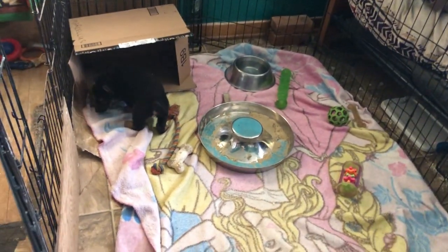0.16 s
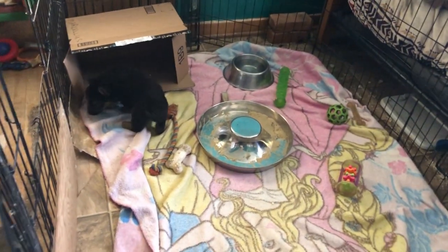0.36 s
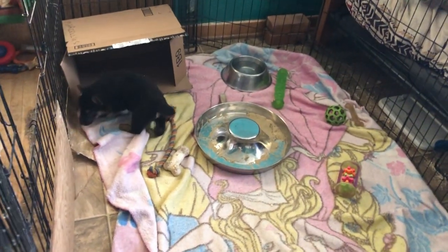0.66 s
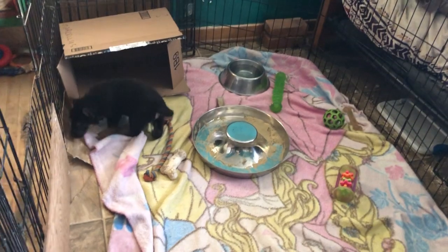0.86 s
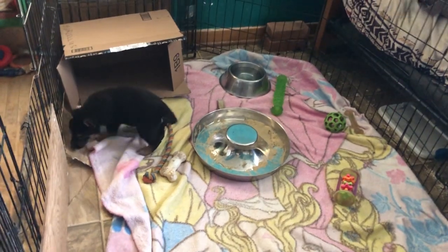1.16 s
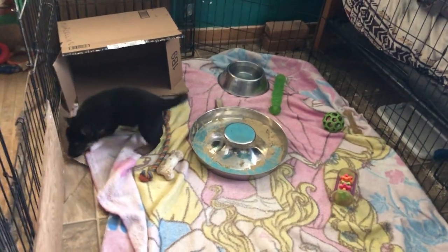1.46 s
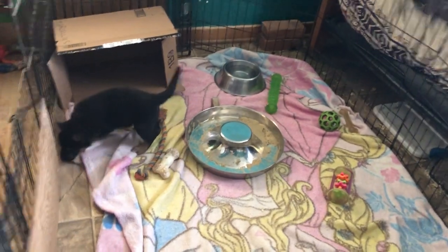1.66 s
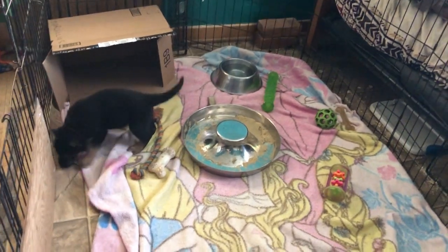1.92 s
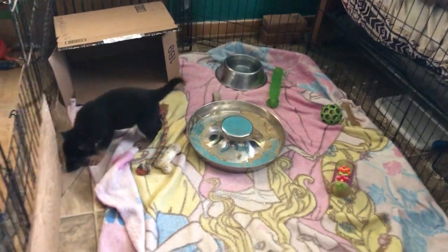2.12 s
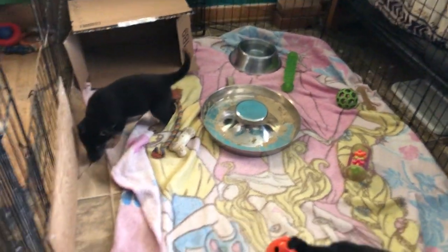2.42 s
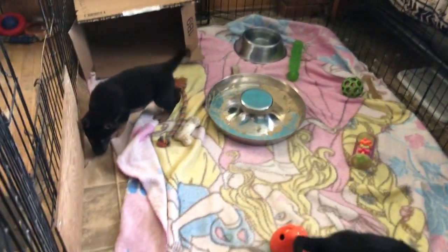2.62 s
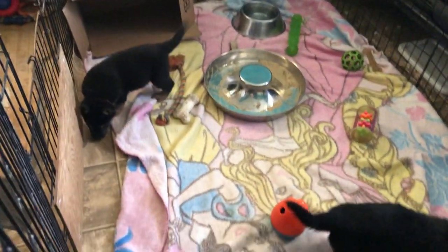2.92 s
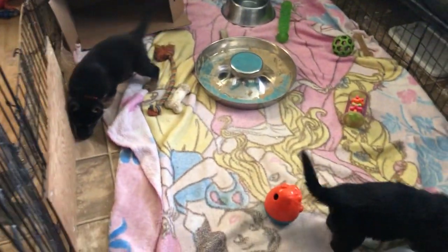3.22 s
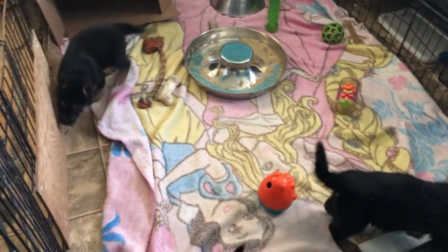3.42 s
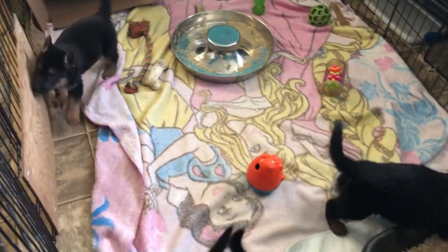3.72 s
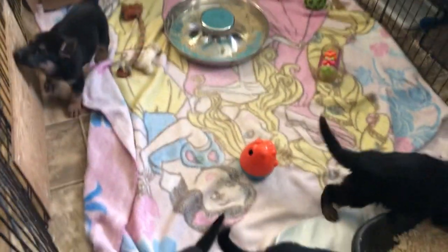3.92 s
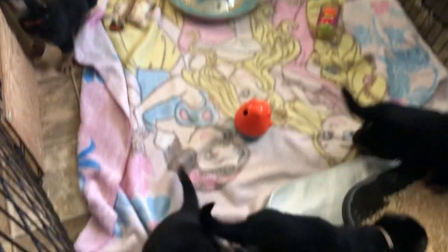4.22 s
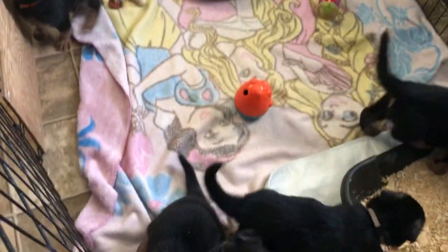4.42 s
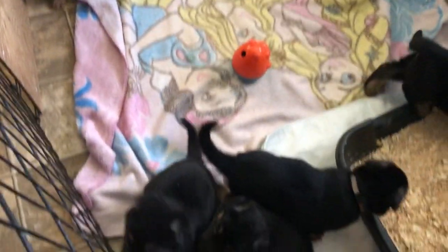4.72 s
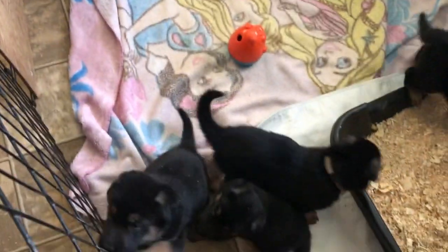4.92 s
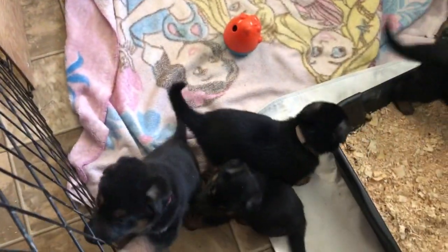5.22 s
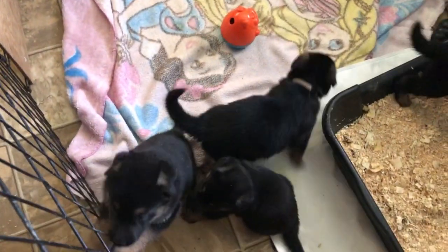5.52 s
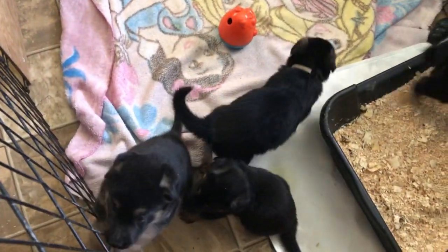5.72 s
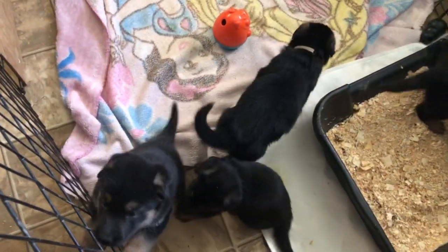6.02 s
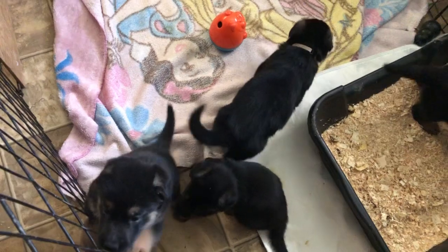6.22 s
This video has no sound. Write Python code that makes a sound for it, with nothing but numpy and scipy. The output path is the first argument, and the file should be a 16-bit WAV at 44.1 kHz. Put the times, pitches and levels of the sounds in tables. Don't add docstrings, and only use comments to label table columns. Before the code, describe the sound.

A quiet, small hard room, heard closely by a phone microphone. From 0 to 0.7 s paws shuffle and scuff on blankets, with small breath puffs and one claw tap. A faint squeak comes at 0.8 s, then short hoarse puppy yelps at 1.0, 1.3, 1.6 (loudest of these) and 1.95 s, some tailing into thin, very high nasal whistles. Claws flick the wire fence around 1.6, 1.9, 2.2 and 2.4 s, and again at 3.8. Longer whines begin: a low wavering one at 2.3, a steadier one at 2.7, a yelp stretching into a whine at 3.1-3.5, one climbing and breaking higher at 3.65-4.0. The loudest, highest cry bursts at 4.2 and falls by 4.5, slightly overloading. Then soft hums from 4.7 to the end at about 6.3, a second puppy's distant whimpers between them, blanket rustles and claw taps on tile, hardest near 5.7.

```python
import sys
import numpy as np
from scipy import signal
from scipy.fft import rfft, irfft, next_fast_len
from scipy.io import wavfile
from scipy.ndimage import uniform_filter1d, map_coordinates

SR = 44100
rng = np.random.default_rng(int(sys.argv[2]) if len(sys.argv) > 2 else 0)


def transcribe(u):
    v = np.clip(np.atleast_2d(u).T, -1, 1)
    q = np.round(v * 32767).astype(np.int16)
    wavfile.write(sys.argv[1], SR, q)


def voltage_ratio(decibels):
    exponent = np.asarray(decibels, float) / 20
    return 10 ** exponent


N = 280476
TOP_HZ = 15830


def along(points, hz):
    f, v = np.transpose(points)
    return np.interp(np.log(hz + 1), np.log(f + 1), v)


def unit(x):
    return x / np.sqrt(np.mean(x ** 2) + 1e-20)


def wobble(rate, size=N):
    knots = rng.standard_normal(int(size * rate / SR) + 4)
    return map_coordinates(knots, [np.arange(size) * rate / SR])


def wobbles(count, rate, size):
    return np.array([wobble(rate, size) for _ in range(count)])


def noise(spectrum):
    m = next_fast_len(N + 8192)
    colour = voltage_ratio(along(spectrum, np.fft.rfftfreq(m, 1 / SR)))
    return unit(irfft(rfft(rng.standard_normal(m)) * colour, m)[:N])


def bursts(rows):
    t = np.arange(N) / SR
    envelope = np.zeros(N)
    for start, length, db in rows:
        u = (t - start) / length
        envelope += voltage_ratio(db) * np.clip(u / 0.17, 0, 1) * np.clip((1 - u) / 0.7, 0, 1)
    return envelope


def phrases(tables, rise, fall):
    for rows in tables:
        s, *cols = np.transpose(rows)
        t = np.arange(round(s[0] * SR), min(round(s[-1] * SR), N)) / SR
        gate = np.clip(np.minimum((t - s[0]) / rise, (s[-1] - t) / fall), 0, 1)
        yield round(s[0] * SR), t, [np.interp(t, s, c) for c in cols], gate


# time in seconds, paw level in dB, blanket rustle level in dB.
SHUFFLE = [
    (0, -60, -68),
    (.65, -69, -73),
    (4.4, -68, -72),
    (5.2, -61, -69),
    (6.0, -68, -73),
]
# start in seconds, length in seconds, level in dB.
SCUFFS = [(0, 0.076, -58.5), (.125, 0.049, -62.5), (.355, 0.09, -59), (.49, 0.062, -59), (2.56, 0.097, -78),
          (4.55, 0.18, -55), (5.0, 0.12, -53), (5.08, 0.21, -58), (5.61, 0.24, -68.5), (6.083, 0.14, -55)]
# frequency in Hz, level in dB.
PAWS = [(24, -45.5), (40, -8), (331, -11.5), (557, -9), (951, -17), (1400, -22), (1820, -49.5),
        (3080, -120)]
# frequency in Hz, level in dB.
RUSTLE = [(530, -40), (900, 3), (3110, -2.5), (4460, -4.5), (5280, -2), (14900, -9.5), (16000, -22.5)]


def shuffling():
    s, paws_db, rustle_db = np.transpose(SHUFFLE)
    t = np.arange(N) / SR
    lumps = wobble(12)
    paws = voltage_ratio(np.interp(t, s, paws_db) + 3 * lumps + 2 * wobble(45)) * noise(PAWS)
    cloth = voltage_ratio(np.interp(t, s, rustle_db)) + bursts(SCUFFS)
    return paws + cloth * voltage_ratio(1.5 * lumps + 2 * wobble(60)) * noise(RUSTLE)


# frequency in Hz, level in dB.
AIR = [(15, -50.5), (25, -10.5), (309, 5), (591, -11.5), (911, -3), (2550, -13), (4140, -10.5),
       (14800, -25.5), (16000, -26.5)]


def room_air():
    return voltage_ratio(-57.5 - 4.5 + 1.5 * wobble(7) + wobble(30)) * noise(AIR)


# start in seconds, length in seconds, centre in Hz, level in dB.
PANTS = [(0.125, 0.094, 240, -53), (0.371, 0.093, 338, -46), (0.84, 0.088, 198, -55.5),
         (1.078, 0.11, 345, -48), (1.227, 0.094, 163, -58), (1.629, 0.038, 360, -43.5),
         (2.627, 0.17, 487, -50), (3.024, 0.16, 540, -47.5), (4.582, 0.15, 215, -50),
         (5.087, 0.13, 230, -56.5), (5.577, 0.051, 510, -65), (5.907, 0.16, 540, -55.5),
         (2.567, 0.17, 2600, -61.5), (3.52, 0.12, 4000, -58), (5.72, 0.027, 2000, -66),
         (5.74, .02, 1000, -52)]


def panting():
    out = np.zeros(N)
    for s, length, hz, db in PANTS:
        b, a = signal.iirpeak(hz, 1.1, SR)
        breath = signal.lfilter(b, a, rng.standard_normal(N))
        out += bursts([(s, length, db)]) * unit(signal.lfilter(b, a, breath))
    return out * voltage_ratio(4.2 * wobble(70))


# time in seconds, level in dB.
TICKS = [
    (.38, -52.5),
    (4.564, -51.5),
    (4.93, -59),
    (5.01, -47),
    (5.05, -56),
    (5.095, -51),
    (5.193, -47),
    (5.429, -67),
    (5.678, -40.5),
    (5.977, -50.5),
]


def ticks():
    out, t = np.zeros(N + SR), np.arange(SR // 50) / SR
    for s, db in TICKS:
        tap = np.diff(rng.standard_normal(len(t) + 1))
        out[round(s * SR):][:len(t)] += voltage_ratio(db - 60 * t / 0.011) * tap
    return out[:N]


# time in seconds, share of pitch lost in 20 ms.
FALLS = [
    (2.512, .2),
    (2.945, .14),
    (4.005, .2),
]


def fold_pitch(hz, t):
    lost = sum(share * np.clip((t - s) / .02, 0, 1) * (t < s + .04) for s, share in FALLS)
    return uniform_filter1d(hz * (1 - lost), size=250)


# middle in seconds, half length in seconds, roughness from 0
RASPS = [
    (.797, .008, 1.2),
    (1.075, .025, .35),
    (1.36, .03, .3),
    (1.995, .012, .4),
    (2.03, .04, .15),
    (3.2, .03, .15),
    (3.72, .03, .15),
    (4.195, .015, .08),
    (6.155, .015, .35),
]


def roughness(t, loud, strain, fray, done, sag):
    rough = .012 + strain * np.clip((loud + 25) / 12, 0, 1)
    rough = rough + fray * done ** 2 + .015 * sag
    return rough + sum(depth * np.exp(-((t - s) / half) ** 2) for s, half, depth in RASPS)


# frequency in Hz, level in dB.
MOUTH = [(2600, -4), (3300, 1.5), (4400, 0.5), (5200, -7), (6300, -2.5), (7300, -6.5), (8300, -13.5),
         (9000, -61)]


def mouth_shape(harmonics, t, mouth, tilt_db, ridge_db, ridge_hz, soft):
    tilt = tilt_db * np.log2(harmonics / 4000)
    ridge = ridge_db * np.exp(-((harmonics - ridge_hz) / 540) ** 2)
    shape = voltage_ratio(along(MOUTH, harmonics) + tilt + ridge)
    jaw = np.clip((t - t[0]) / .012, .12, 1)
    shape *= voltage_ratio(mouth) * jaw / np.sqrt(np.sum(shape[:5] ** 2, axis=0))
    return shape * voltage_ratio(-15 * soft * np.maximum(np.log2(harmonics / 5550), 0))


# frequency in Hz, level in dB.
SHEEN = [(7500, -40), (9000, -14), (10000, -3), (11500, 0), (13500, -4), (15500, -2)]


def sheen(harmonics, t, mouth, level_db):
    patches = 6 * wobbles(len(harmonics), 36.1, len(t))
    glint = voltage_ratio(0.43 * mouth + level_db + patches + along(SHEEN, harmonics))
    return glint * np.minimum((t - t[0]) / .03, 1) * (harmonics < TOP_HZ)


# frequency in Hz, level in dB.
BREATH = [(500, -3), (3000, 4), (7000, -9.5), (9000, -4.5), (12000, -43)]


def voice(tables, tongues, moves, jitter, shimmer_db, sheen_db, breath_db, strain, frays, nose_under_db):
    out, breath = np.zeros(N), noise(BREATH)
    k = np.arange(4, 26)[:, None]
    calls = phrases(tables, rise=.003, fall=.005)
    for (at, t, (hz, first, opening), gate), tongue, move, fray in zip(calls, tongues, moves, frays):
        size = len(gate)
        air = breath[at:at + size]
        done = np.linspace(0, 1, size)
        second_db, third_db, tilt_db = (start + gain * (done - .5) for start, gain in zip(tongue, move[:3]))
        own_sheen_db, ridge_start_hz = tongue[3:]
        ridge_db, ridge_end_hz = move[3:]
        ridge_hz = ridge_start_hz + (ridge_end_hz - ridge_start_hz) * done

        hz = fold_pitch(hz, t)
        slack = np.clip(-np.gradient(np.log2(hz)) * SR, 0, 2.91)
        sag = np.maximum(slack - 2.59, 0)
        mouth = first + opening - 9.5 * sag
        second = -35.5 + 1.1 * (first + opening + 35.5) + 0.74 * slack + second_db + 3 * wobble(33.3, size)
        third = -35.5 + 1.84 * (mouth + 35.5) + third_db + 3 * wobble(28.4, size)
        loud = uniform_filter1d(np.maximum(first, mouth), size=1500)
        rough = roughness(t, loud, strain, fray, done, sag)

        hz = hz * (1 + jitter * wobble(60, size) + .07 * rough * wobble(220, size))
        phase = 2 * np.pi * np.cumsum(hz) / SR
        low = voltage_ratio(first) * np.sin(phase) + voltage_ratio(second) * np.sin(2 * phase + 1)
        low += voltage_ratio(third) * np.sin(3 * phase + 2)

        flutter = voltage_ratio(5 - shimmer_db * np.abs(wobbles(len(k), 24.4, size)))
        shape = mouth_shape(k * hz, t, mouth, tilt_db, ridge_db, ridge_hz, soft=first.max() < nose_under_db)
        shape += sheen(k * hz, t, mouth, sheen_db + own_sheen_db)
        blur = rng.uniform(0, 2 * np.pi, k.shape) + .0016 * k ** 2 * np.pi * wobbles(len(k), 400, size)
        upper = np.sum(shape * flutter * np.sin(k * phase + blur), axis=0)

        puffs = voltage_ratio(.6 * mouth + breath_db) * (1 + .5 * np.cos(phase)) * air
        puffs += voltage_ratio(loud[SR // 200] - 11.5) * np.exp(-(t - t[0]) / .0078) * air
        tone = np.sqrt(2) * (low + upper) * (1 + rough * wobble(160, size))
        out[at:at + size] += gate * (tone + puffs)
    return out


# second dB, third dB and brightness in dB an octave gained over it,
# ridge height in dB, ridge at the end in Hz.
CRIES = [
    [(.757, 1036, -60, 0), (.768, 953, -56, -2), (.78, 930, -50.5, -1), (.792, 982, -45.5, -10),
     (.829, 888, -45.5, -19)],
    [(1.003, 877, -46.5, -2), (1.023, 939, -29, -12), (1.046, 1040, -19.5, -10.5),
     (1.056, 1165, -14, -14.5), (1.068, 1148, -17, -14.5), (1.085, 1071, -19, -13), (1.1, 1028, -30, -16),
     (1.12, 1076, -28, -18)],
    [(1.272, 830, -45.5, -4), (1.291, 855, -36, -8), (1.303, 1011, -21, -13.5), (1.32, 1045, -25, -6.5),
     (1.336, 1049, -17.5, -17.5), (1.36, 1029, -28.5, -15), (1.385, 964, -35, -14.5)],
    [(1.578, 870, -32, -27), (1.592, 1018, -32.5, -8), (1.606, 1047, -14, -20.5), (1.632, 1094, -11, -24),
     (1.66, 1099, -19, -26), (1.7, 1051, -22.5, -30.5)],
    [(1.945, 770, -45, -2), (1.971, 817, -40, 2.5), (1.993, 982.5, -21, -6.5), (2.008, 909, -37.5, 5),
     (2.083, 922.4, -33.5, -16), (2.129, 884, -47.5, 3.5)],
]
CRY_TONGUES = [(-1, 5, 22, 3.5, 3700), (-6.5, -3, -3, -1, 4030), (-1.5, 0, -24, -2.5, 4500),
               (2.5, 8, 5, 8, 4300), (-0.5, 0, -2, -8, 4120)]
CRY_MOVES = [(7, 0, -4, 13.5, 4000), (30, -16, 5, 7, 4650), (1, 4.5, 0.5, 10, 3800),
             (1, -4, -2.5, 7.5, 4300), (-11, 4, 20, 3, 3700)]
CRY_FRAYS = [.4, .4, .25, .12, .3]


def yelps():
    return voice(CRIES, CRY_TONGUES, CRY_MOVES, jitter=.004, shimmer_db=8, sheen_db=-42, breath_db=-38,
                 strain=.05, frays=CRY_FRAYS, nose_under_db=-60)


WHISTLE_STARTS_S = [.785, 1.072, 1.36, 1.725, 2.1, 3.997, 4.419, 5.362, 5.611, 5.937, 6.142, 6.078, 5.626,
                    3.482, 2.704, 2.94, 3.87]
# length in seconds, pitch in Hz, tone in dB, hiss in dB, share of pitch above the middle at first.
WHISTLES = [(.09, 6960, -50, -61, .089), (.055, 6820, -50, -55, .017), (.075, 6900, -54.5, -58, .07),
            (.075, 7000, -48, -64, .035), (.04, 7040, -44, -67, .04), (.04, 7130, -45, -58, .07),
            (.13, 7050, -50, -68, .015), (.031, 7170, -48, -61, .09), (.021, 7600, -48, -62, .08),
            (.021, 7750, -52, -63, .07), (.045, 6950, -50, -56, .1), (.016, 7600, -58, -72, -.044),
            (.12, 6700, -89, -65, .02), (.03, 7780, -49, -70, .01), (.02, 8050, -54, -68, .01),
            (.04, 7300, -56, -63, .04), (.13, 7520, -49, -67, .01)]
# frequency in Hz, level in dB.
EXHALE = [(1000, -19.5), (3000, -6), (5500, -15), (7500, -3.5), (9000, -4), (12000, -20), (15500, -11.5)]


def whistles():
    out = np.zeros(N)
    air = noise(EXHALE) * voltage_ratio(2 * wobble(50))
    swell_db, hiss_fade_db, settle = 5, 10.5, .03
    shapes = []
    for s, (length, hz, tone_db, hiss_db, glide) in zip(WHISTLE_STARTS_S, WHISTLES):
        shapes.append([(s, hz * (1 + glide), tone_db - swell_db, hiss_db + hiss_fade_db / 2),
                       (s + length / 2, hz, tone_db, hiss_db),
                       (s + length, hz * (1 - settle), tone_db - swell_db, hiss_db - hiss_fade_db / 2)])
    for at, t, (hz, tone_db, hiss_db), gate in phrases(shapes, rise=.012, fall=.012):
        phase = 2 * np.pi * np.cumsum(hz * (1 + .005 * wobble(120, len(t)))) / SR
        tone = np.sqrt(2) * voltage_ratio(tone_db) * (np.sin(phase) + voltage_ratio(-9) * np.sin(2 * phase))
        out[at:at + len(t)] += gate * (tone + voltage_ratio(hiss_db + 8.5) * air[at:at + len(t)])
    return out


# time in seconds, peak in dB, snap in dB above the thump.
FLICKS = [
    (1.578, -29.5, 0),
    (1.877, -33, 5),
    (2.162, -34, 4.5),
    (2.202, -58, 11),
    (2.365, -29, 2),
    (3.789, -31.5, 1.5),
]


def flicks():
    out, t = np.zeros(N + SR), np.arange(SR // 20) / SR
    for s, db, snap_db in FLICKS:
        scrape = uniform_filter1d(rng.standard_normal(len(t)), size=4)
        snap = voltage_ratio(-60 * t / 0.0059) * (np.sin(2 * np.pi * 2300 * t) + 0.5 * scrape)
        hz = 70 + 340 * np.exp(-(t / 0.01) ** 2) + 900 * np.exp(-t / 0.0014)
        swell = (t / 0.0037) ** 2 * np.exp(2 - 2 * t / 0.0036)
        swell += 0.11 * (1 - np.exp(-t / 0.0031)) * np.exp(-t / 0.035)
        thump = swell * np.sin(2 * np.pi * np.cumsum(hz) / SR)
        out[round((s - .001) * SR):][:len(t)] += voltage_ratio(db) * (thump + voltage_ratio(snap_db + 2) * snap)
    return out[:N]


WHINES = [
    [(2.31, 689, -39, -11), (2.322, 746, -34.5, -5.5), (2.344, 795, -42, 13.5), (2.376, 833, -52, 29),
     (2.422, 828, -35.5, -6), (2.46, 831, -43.5, 2), (2.49, 864, -47, 5.5), (2.534, 892, -41, -15.5)],
    [(2.71, 803, -35, -5.5), (2.724, 840, -38.5, 6), (2.748, 969, -28.5, -2.5), (2.778, 1018, -25.5, -4.5),
     (2.8, 987, -44.5, -5), (2.86, 1001, -38, -10.5), (2.896, 1007, -35, -11), (2.964, 912, -40, -10)],
    [(3.133, 744, -34.5, -13), (3.15, 844, -32, -1), (3.165, 945, -23.5, -4), (3.189, 1046, -16, -10.5),
     (3.217, 929, -41.5, 12), (3.243, 928.7, -27.5, -19), (3.32, 964.6, -42, -4.5),
     (3.42, 951, -34.5, -12.5), (3.463, 891, -32, -12.5), (3.5, 676, -46, -6)],
    [(4.158, 751, -37, -9.5), (4.19, 1023, -19.5, -6), (4.203, 1121, -7.5, -23.5),
     (4.227, 1244, -11, -19.5), (4.262, 1124, -25.5, -6.5), (4.308, 1112, -27.5, -22.5),
     (4.36, 1144, -23.5, -20), (4.455, 1061, -29, -17), (4.525, 765, -48, -9.5)],
]
REOPENED = [
    [(3.655, 772.5, -33.5, -2), (3.683, 918, -29.5, -0.5), (3.711, 1051, -18.5, -6.5),
     (3.74, 1033, -24, -13.5), (3.77, 1053, -44, -20), (3.79, 1060, -32, -14), (3.83, 1126, -34.5, -20),
     (3.86, 1107, -31.5, -4)],
    [(3.856, 1151, -26.5, -9), (3.875, 1191, -34.5, 0.5), (3.937, 1155, -29, -6),
     (4.005, 1094, -31.5, -21.5), (4.029, 1030, -54.5, -4)],
]
HUMS = [
    [(4.67, 713, -34, -12), (4.7, 778, -40, -1), (4.73, 848, -27.5, -13), (4.798, 790, -34.5, -17.5),
     (4.85, 829.6, -33, -26), (5.038, 794.7, -31.5, -23), (5.058, 763, -68, 9)],
    [(5.25, 778, -36.5, -24.5), (5.294, 828.4, -38, -11), (5.344, 783.3, -29, -26.5), (5.384, 766, -50, -1)],
    [(5.57, 720, -45, -33), (5.6, 784, -30.5, -19.5), (5.622, 818, -49, -7.5), (5.65, 793, -58, -14)],
    [(5.895, 687, -39, -11), (5.915, 759, -36, -25.5), (5.955, 695, -43, -7.5)],
    [(6.092, 784, -38, -29.5), (6.12, 825, -33, -27), (6.148, 878, -27.5, -20.5), (6.168, 907, -44, -9.5),
     (6.194, 860.6, -46, 7), (6.225, 836, -37, -15), (6.298, 854, -40.5, -15), (6.334, 825, -37.5, -13.5),
     (6.356, 713, -52.5, 2.5)],
]
WHINE_TONGUES = [(-6.5, -13, -13.5, -5, 3400), (2.5, 5, -4.5, -2, 6530), (2, 3, -4, -1.5, 3800),
                 (2, -1, -6.5, 1, 4000)]
REOPENED_TONGUES = [(2, 5.4, -8, 0.95, 4600), (8, 7.1, 11, 1.5, 4600)]
HUM_TONGUES = [(2.4, 9, -4.5, 0.19, 3600), (2, 3.5, 7, 2.9, 3100), (3.6, -12, 1, 2, 2900),
               (6.5, -7, 12, 1.3, 5700), (0.65, 1.5, -4, 0.98, 4700)]
WHINE_MOVES = [(9.5, 0, 0, 4.2, 2000), (4.5, 2, 0, 9.1, 6000), (4.5, 3, 0, 2.3, 4500),
               (-8, 4, 0, 5.5, 4550)]
REOPENED_MOVES = [(0, 0, 0.0024, 2.7, 4300), (0, -0.71, 0, 8.6, 4580)]
HUM_MOVES = [(0, 0, 0, 1.9, 4000), (0, 0, 0, 6, 3200), (0, 0, 0, 11, 3200), (0, 0, 0, 8, 3500),
             (0, 0, 0.0069, 9.1, 4200)]


def whines_and_hums():
    calls = WHINES + REOPENED + HUMS
    tongues = WHINE_TONGUES + REOPENED_TONGUES + HUM_TONGUES
    moves = WHINE_MOVES + REOPENED_MOVES + HUM_MOVES
    return voice(calls, tongues, moves, jitter=.0022, shimmer_db=7, sheen_db=-48, breath_db=-41,
                 strain=.1, frays=np.full(11, .015), nose_under_db=-25)


# time in seconds, level in dB.
JOLTS = [
    (4.213, -34),
    (4.226, -31),
]


def jolts():
    t = np.arange(N) / SR
    return sum(voltage_ratio(db) * np.exp(-((t - s) / .00016) ** 2) for s, db in JOLTS)


WHIMPERS = [
    [(4.585, 693, -57, -22), (4.601, 643.6, -33.5, -25), (4.639, 729, -49.5, -17), (4.68, 683, -30, -30)],
    [(5.09, 646, -63.5, 1.5), (5.168, 725, -46, -24), (5.2, 660, -43, -17), (5.255, 686, -42.5, -33.5)],
    [(5.41, 768.6, -68.5, 7), (5.5, 847, -49.5, -0.5), (5.536, 773, -60, 0.5), (5.553, 702, -49, -5),
     (5.57, 546, -36.5, -11)],
    [(5.74, 779, -51.5, -10), (5.786, 927, -49.5, -7), (5.805, 953, -51, -12.5), (5.85, 829, -42.5, -10),
     (5.875, 693, -50, -4), (5.9, 557, -40, -12.5)],
    [(6.086, 1257, -50, -36), (6.1, 870, -43, -19.5), (6.13, 975, -44.5, -11.5), (6.17, 940, -53.5, -6)],
]
WHIMPER_TONGUES = [(9.5, 20, 6, 0, 2400), (15, 14, 0, 0.99, 4800), (1.5, -1, -2, 0, 2600),
                   (1.6, 9.5, -2, 0.26, 4800), (6.5, 15, 37, 0, 4590)]
WHIMPER_MOVES = [(-5, 0, 0, 4.5, 2400), (1, 0, 0, 4.1, 4100), (9, 0, 0, 3.9, 3350),
                 (4, 0.0033, 0, 3.5, 4600), (-10, 0, 0, 4.5, 4590)]


def whimpers():
    return voice(WHIMPERS, WHIMPER_TONGUES, WHIMPER_MOVES, jitter=.003, shimmer_db=5, sheen_db=-62,
                 breath_db=-47, strain=0, frays=np.full(5, .02), nose_under_db=0)


# delay in seconds, level in dB.
WALLS = [(.0021, -16), (.0047, -16), (.0083, -16), (.0131, -17), (.0186, -18)]


def walls(x):
    out = x.copy()
    for i, (delay, db) in enumerate(WALLS):
        out += (-1) ** i * voltage_ratio(db) * np.pad(x, (round(delay * SR), 0))[:N]
    return out


# frequency in Hz, time to fall 60 dB in seconds.
ROOM = [(300, 0.084), (1000, 0.31), (3000, 0.31), (7000, 0.27), (14000, 0.22)]


def room(x):
    hz, t, z = signal.stft(rng.standard_normal(SR * 3 // 4), SR, nperseg=256)
    decay = voltage_ratio(-60 * t / along(ROOM, hz)[:, None])
    tail = signal.istft(z * decay, SR, nperseg=256)[1]
    return signal.fftconvolve(np.pad(x, (250, 0)), tail / np.linalg.norm(tail))[:N]


def scene():
    near = yelps() + whines_and_hums()
    far = whimpers()
    whistle, claws = whistles(), flicks()
    wet = voltage_ratio(-7.5) * near + voltage_ratio(-1.0) * far + voltage_ratio(-37) * claws + voltage_ratio(-9) * whistle
    calls = walls(near + far) + whistle + room(wet)
    small_noises = claws + panting() + shuffling() + room_air() + ticks()
    return (calls + small_noises + jolts())[None]


def band_limit(x):
    return signal.sosfilt(signal.butter(12, 15850, fs=SR, output="sos"), x)


def record(dry):
    lopsided = dry + .004 * dry ** 2
    bent = signal.lfilter(*signal.butter(2, 45 / (SR / 2), "high"), lopsided)
    bent = bent / (1 + np.abs(bent) ** 8) ** (1 / 8)
    banded = irfft(rfft(bent) * (np.fft.rfftfreq(N, 1 / SR) < TOP_HZ), N)
    return band_limit(banded)


dry = scene()
out = record(dry)
transcribe(out)
```